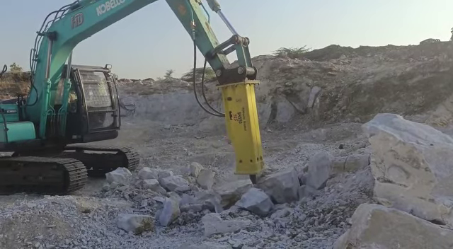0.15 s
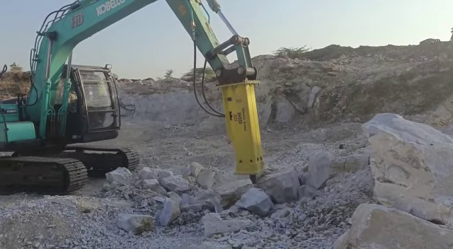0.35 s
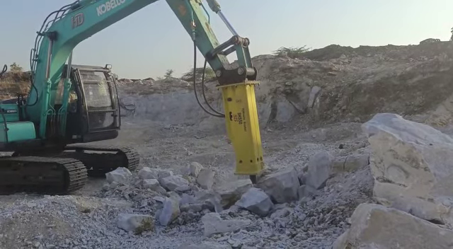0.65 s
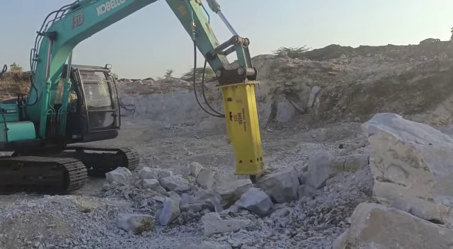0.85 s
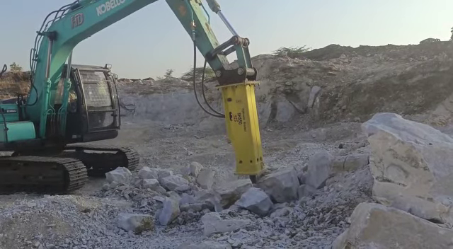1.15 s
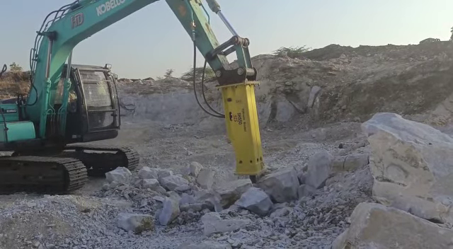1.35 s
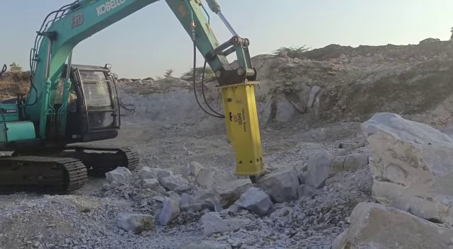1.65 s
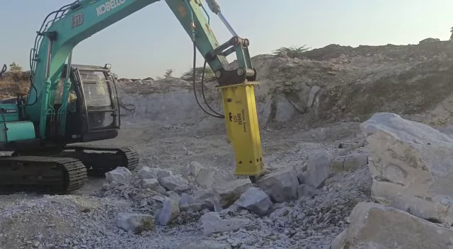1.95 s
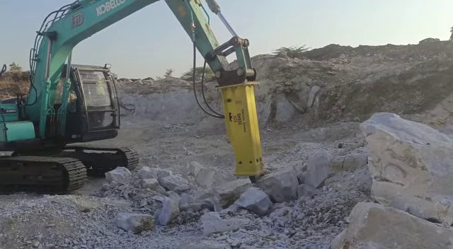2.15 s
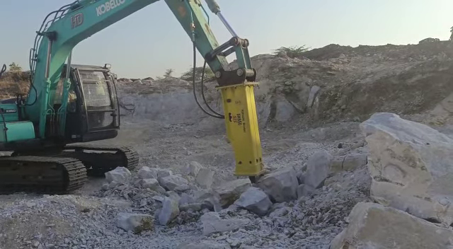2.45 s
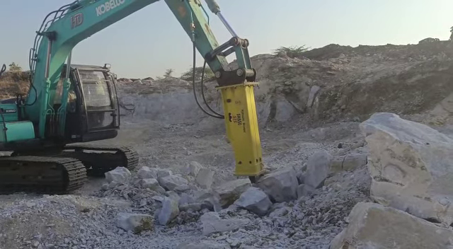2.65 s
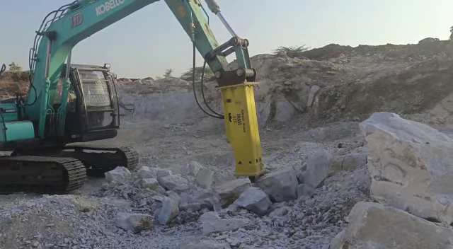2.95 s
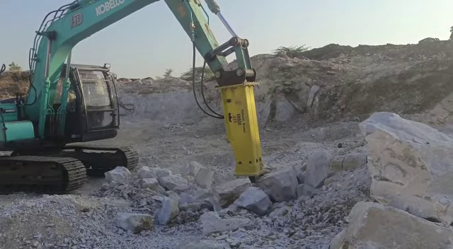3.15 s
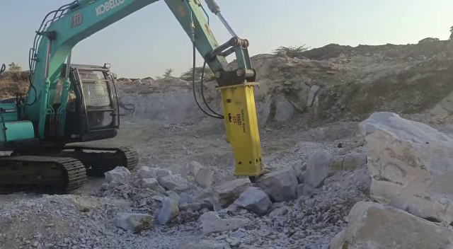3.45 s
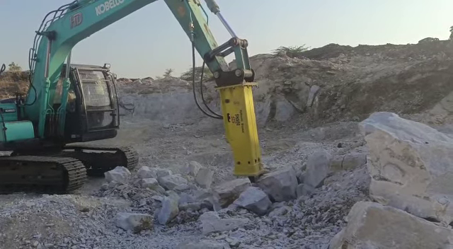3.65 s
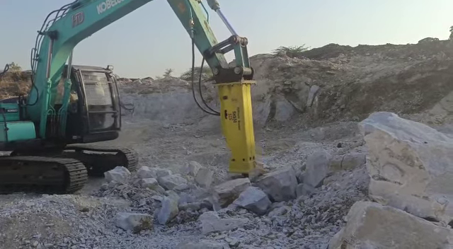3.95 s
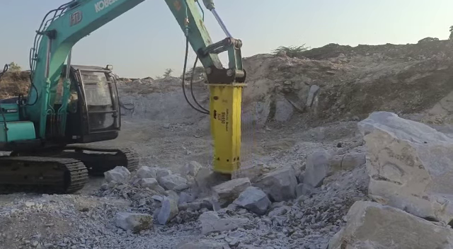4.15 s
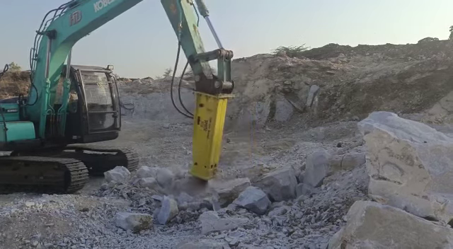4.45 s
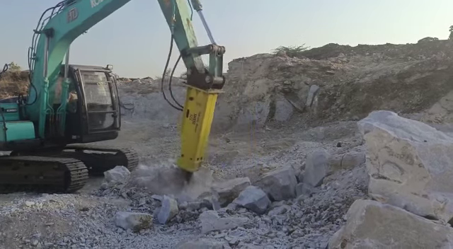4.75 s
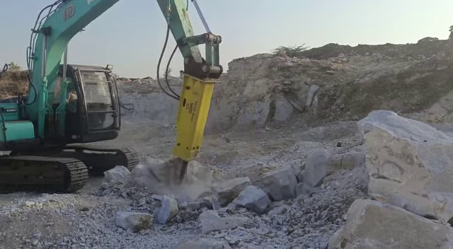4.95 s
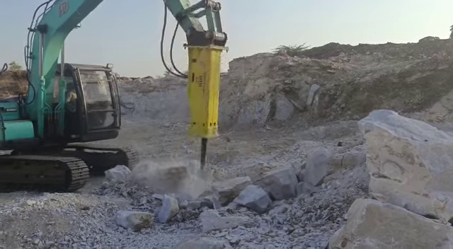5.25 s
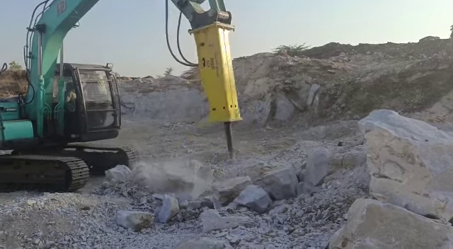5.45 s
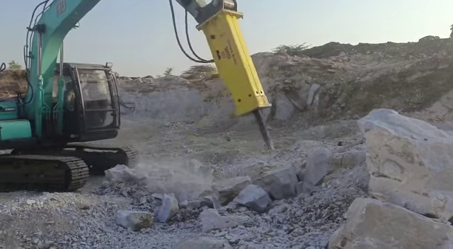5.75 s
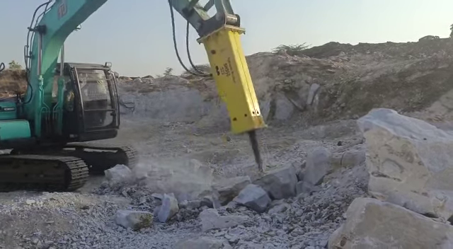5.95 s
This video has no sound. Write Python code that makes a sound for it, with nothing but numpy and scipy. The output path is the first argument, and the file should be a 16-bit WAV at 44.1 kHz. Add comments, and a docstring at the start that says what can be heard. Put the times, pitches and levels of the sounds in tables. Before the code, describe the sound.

A hydraulic breaker hammers stone about nine hard metallic blows a second over a humming diesel, then the stone splits, rubble slides and slack steel clanks.

```python
"""A hydraulic breaker on an excavator hammers stone about nine times a second in an open quarry, then stops.
A valve snaps just ahead of each blow; tool and housing ring, the ground thumps. When the stone splits, rubble
slides and the slack steel clanks; a loose pin pings. The diesel engine and its oil pump hum on throughout.
Hum is shaft-locked sines; crash, valve, engine and slides are shaped noise; steel, pin and grit are struck
resonators; the thump is a falling sine; each knock is a noise puff with a note."""
import sys
import numpy as np
from scipy import signal
from scipy.fft import rfft, irfft, next_fast_len
from scipy.io import wavfile

SR = 44100
rng = np.random.default_rng(int(sys.argv[2]) if len(sys.argv) > 2 else 0)


def transcribe(u):
    """Save the signal u as a 16-bit wav file named by the first command-line argument.

    u: samples, shape (n,) or (channels, n), limited to [-1, 1]; the rate is SR.
    q: integer samples, one column per channel.
    """
    v = np.clip(np.atleast_2d(u).T, -1, 1)
    q = np.round(v * 32767).astype(np.int16)
    wavfile.write(sys.argv[1], SR, q)


def ratio_of_db(decibels):
    """Turn decibels (scalar or array-like) into linear amplitude factors; 0 dB maps to 1."""
    return 10 ** (np.asarray(decibels, float) / 20)


N = 268569

# blows of the breaker: t/s, relative strength/dB
BLOWS = [(0.0619, 0.5), (0.171, 1), (0.2776, 2), (0.3734, 0.5), (0.4696, -0.5), (0.5641, 1.5), (0.66, 0.5),
         (0.7618, 1.5), (0.8676, 0), (0.9754, 0.5), (1.083, -0.5), (1.191, -0.5), (1.2983, 0.5),
         (1.4061, 0), (1.5113, 0), (1.6158, 1), (1.722, 1), (1.8301, 0), (1.937, -0.5), (2.0424, 1.5),
         (2.1487, 0), (2.2571, 0), (2.3656, 0), (2.4716, 0), (2.579, 0.5), (2.6869, 0), (2.796, -1),
         (2.9057, -0.5), (3.0138, -1), (3.1235, 0.5), (3.233, 1), (3.344, 1), (3.4551, 1), (3.5652, 0),
         (3.6702, 0.5)]
BLOW_S, BLOW_DB = np.transpose(BLOWS)
# knocks of stones and slack steel: t/s, relative peak/dB, f/Hz, low tool ring/dB, high tool ring/dB
KNOCKS = [(3.7544, -8, 3330, -31, -26), (3.7599, -2, 1874, -15.5, -40), (3.8751, -23, 920, -37, -46),
          (4.1669, -20, 900, -43, -56), (4.2752, -33, 970, -45, -58), (4.3271, -23, 1640, -35, -55),
          (4.378, -17, 1760, -30, -55), (4.398, -18.5, 2980, -41, -50), (4.4104, -12, 868, -36, -57),
          (4.469, -16.5, 1380, -37, -62), (4.7022, -24, 2180, -38, -63), (4.7935, -23, 1860, -31, -63),
          (4.8257, -21, 1380, -30, -62), (4.8539, -20, 1420, -28, -61), (4.9207, -16, 870, -10.5, -58),
          (4.974, -10, 4170, -27, -50), (4.9782, -6, 1310, -11.5, -32), (5.010, -8, 4170, -17, -50),
          (5.0145, 0, 1367, -33, -14), (5.0344, -5, 1223, -21, -47), (5.0614, -12, 2160, -15, -52),
          (5.068, -18, 3550, -17.5, -62), (5.1044, -13.5, 1920, -31, -62), (5.14, -23, 2282, -27, -65),
          (5.198, -24, 2200, -45, -63), (5.301, -27, 2220, -34, -62), (5.361, -22, 2450, -34, -68),
          (5.6895, -18, 850, -31, -62), (5.7268, -18, 850, -32, -65), (5.7742, -13, 1250, -18, -43),
          (5.8043, -2.5, 1850, -15, -15), (5.8644, -16, 910, -29, -50), (5.9788, -31, 1830, -25, -54),
          (6.0242, -5.5, 1375, -19, -44), (6.0592, -8, 1210, -13, -17.5)]
# machine levels over time: t/s, relative engine noise/dB, pump tone/dB
MACHINE = [(0.0, -15, -30), (0.71, -19.5, -31), (1.34, -20.5, -26), (3.27, -19, -25.5), (3.63, -17.5, -26),
           (3.95, -23, -33), (4.17, -20.5, -35), (4.44, -19, -29), (4.83, -21, -35.5), (5.02, -16.5, -31),
           (5.34, -25.5, -30), (5.89, -22.5, -30), (6.09, -29, -38)]
# left-right likeness: f/Hz, likeness (0..1)
LIKENESS = [(60, 0.98), (150, 1), (380, 0.83), (950, 0.68), (2380, 0.56), (5980, 0.069), (15000, 0.024)]

VALVE_LEAD_S = 0.01976   # valve ahead of the blow
SPLIT_S = 3.69   # stone splits
PUMP_HZ = 274.5   # ninth multiple of the shaft rate


def at_hz(points, hz):
    """Read a table on a log-frequency axis."""
    f, value = np.array(points)[:, 0], np.array(points)[:, 1]
    return np.interp(np.log(hz), np.log(f), value)


def in_time(rows):
    """Columns of a curve, one value a sample."""
    s, *columns = np.transpose(rows)
    return [np.interp(np.arange(N) / SR, s, c) for c in columns]


def drift(rate_hz):
    """Slow chance of spread 1: noise through two equal poles, worked out every 40 samples."""
    r = np.exp(-80 * np.pi * rate_hz / SR)
    slow = signal.lfilter([1], [1, -2 * r, r * r], rng.standard_normal(N // 40 + 2002))[2000:]
    return np.interp(np.arange(N) / 40, np.arange(len(slow)), slow / slow.std())


def train(s, heights):
    """Impulses at the given times, on a tiny floor."""
    out = np.full(N, 1e-18)
    at = np.clip(np.round(np.asarray(s) * SR).astype(int), 0, N - 1)
    np.add.at(out, at, heights)
    return out


def swell(x, rise_s, t60_s):
    """Each impulse rises and then dies away, height about 1."""
    up, down = np.exp(-1 / (rise_s * SR)), ratio_of_db(-60 / (t60_s * SR))
    return signal.lfilter([1 - up], np.convolve([1, -up], [1, -down]), x)


def ring(x, hz, t60_s, bend=1):
    """A unit click rings a sine of height 1; each port has its own phase, further apart in the treble."""
    pole = ratio_of_db(-60 / (t60_s * SR)) * np.exp(2j * np.pi * hz / SR)
    turn = np.arccos(np.clip(at_hz(LIKENESS, hz), 0, 1)) / 2 * rng.choice([-1, 1])
    port_phase = np.exp(1j * turn * np.array([[1], [-1]]))
    return (signal.lfilter([1], [1, -pole], x) * bend * port_phase).imag


def swelling(force, hz, t60_s, build_s, bend=1):
    """A ring that starts from nothing: a fast-dying twin cancels its start."""
    r, w = np.exp(-1 / (max(build_s, 1e-4) * SR)), 2 * np.pi * hz / SR
    twin = signal.lfilter([1 - r], [1, -r * np.exp(1j * w)], force)
    return ring(twin, hz, t60_s, bend)


def pair(hz, mid, side):
    """Left and right from two signals, as alike as this pitch arrives at the ports."""
    alike = np.clip(at_hz(LIKENESS, hz), 0, 1)
    return np.sqrt((1 + alike) / 2) * mid + np.sqrt((1 - alike) / 2) * side * [[1], [-1]]


def seating():
    """As the tool sinks in, the thump grows, the steel is damped and its contact modes shift."""
    # t/s, contact pitch shift/%, relative ground thump/dB, housing/dB, shank/dB, collar/dB, tip/dB, hiss/dB
    sinking = [(0.06, -1, -35, 4, 2, 6.5, 1, 0), (0.2, 0, -25.5, 5.5, 2.5, 4, 0.5, 1),
               (0.47, 1.5, -23.5, 1, 6.5, 2.5, -1.5, 2), (0.8, 0.5, -26, 3.5, 1.5, 3, -1.5, -0.5),
               (1.2, 3.5, -23.5, -1.5, 4, 4, 1.5, 2), (1.65, 3, -22.5, -2, 4, 3.5, 0, 1),
               (2.05, 2.5, -21.5, 0.5, 4.5, 0, 0, 2), (2.3, 0.5, -23.5, -3.5, 1.5, -0.5, 0, 2.5),
               (2.85, 0, -20.5, -3.5, 0, 1.5, 1.5, 4.5), (3.2, 0, -21, 3.5, -0.5, 2, -1.5, 2.5),
               (3.45, 1, -20.5, -5.5, 0.5, 1.5, -1.5, 3), (3.67, -1, -21.5, 2, -4, 3, -2, 2)]
    at, shift, *parts = np.transpose(sinking)
    return np.interp(BLOW_S, at, shift) / 100, *[np.interp(BLOW_S, at, p) + BLOW_DB for p in parts]


def strength(parts, hz):
    """Height of every blow at this pitch, interpolated between the parts that sound there."""
    # pitches of housing, shank, collar, tip and hiss: f/Hz
    part_hz = [700, 1450, 2200, 3800, 9000]
    return ratio_of_db([np.interp(np.log(hz), np.log(part_hz), p) for p in parts.T])


def slides_db(rows, rise_s, trickle_db):
    """Each slide swells, lasts and dies away above the trickle after the split; level in dB, on a 1 ms grid."""
    t = np.arange(0, N / SR, .001)
    power = ratio_of_db(2 * trickle_db) * (t > SPLIT_S) + 1e-10
    for s, length_s, db, t60_s in rows:
        after = np.maximum(t - s, 0)
        fade_db = -60 * np.maximum(after - length_s, 0) / max(t60_s, .01)
        rise = 1 - np.exp(-(after / rise_s) ** 2)
        power += (ratio_of_db(db + fade_db) * rise) ** 2
    return np.interp(np.arange(N) / SR, t, 10 * np.log10(power))


def machine():
    """Pump tone and shaft orders: sines locked to one shaft, all wavering in level and phase."""
    # shaft orders: multiple of shaft rate, level re pump tone/dB
    orders = [(2, -15), (4, -15), (6, -17), (8, -41), (10, -15), (21, -18), (27, -18)]
    turn = 2 * np.pi * PUMP_HZ / 9 * np.arange(N) / SR + 0.386 * drift(1.256)
    out = ratio_of_db(2.0 * drift(2.6)) * np.sin(9 * turn + 0.29 * drift(25.0))
    for k, db in orders:
        out += ratio_of_db(db + 3.7 * drift(5.5)) * np.sin(round(k) * turn + 0.48 * drift(14))
    return out * np.sqrt(2) * ratio_of_db(in_time(MACHINE)[1])


def engine_power(hz, engine):
    """Engine noise in one band, pulsing at twice the shaft rate."""
    # engine spectrum: f/Hz, relative density/dB
    engine_tone = [(25, -26), (48, -14), (65, -8), (100, -11), (165, -2), (250, -7), (320, -8), (430, -20),
                   (659, -12), (1160, -24), (2760, -26), (3720, -30), (6210, -41), (16000, -46)]
    firing = 1 + 0.21 * np.sin(2 * np.pi * PUMP_HZ * 2 / 9 * np.arange(N) / SR)
    return (ratio_of_db(15.5 + at_hz(engine_tone, hz) + 1.94 * drift(9.2)) * engine * firing) ** 2


def valve_power(hz, end):
    """Valve snap in one band: a noise burst ahead of each blow."""
    # valve spectrum: f/Hz, relative density/dB
    valve_tone = [(530, -40), (900, -8), (2220, -3), (2630, -88), (2960, -1), (4360, -4), (6110, -12.5),
                  (7140, -6.5), (11000, -14), (14000, -4.5), (16000, -17)]
    chance = ratio_of_db(rng.normal(0, 1.5, len(BLOW_S)))
    snap = swell(train(BLOW_S - VALVE_LEAD_S, chance)[:end], 0.0029, 0.083)
    return (ratio_of_db(-10.5 + at_hz(valve_tone, hz)) * snap) ** 2


def crash_power(hz, parts, end):
    """Crushed stone in one band: a sharp hit, plus a bite of 3.9 ms with a pitch-dependent decay."""
    # crash spectrum: f/Hz, relative density/dB
    crash_tone = [(280, -71), (480, 3.5), (1120, -7), (1490, -1.5), (1800, -5.5), (2270, -9), (2670, -13.5),
                  (4400, -3), (5990, -24), (7460, -11.5), (11400, -17), (14200, -15.5), (16000, -44)]
    # decay of the bite: f/Hz, t60/s
    crash_t60 = [(300, 0.022), (1000, 0.33), (3000, 0.22), (8000, 0.18), (11000, 0.088), (13500, 0.31),
                 (16000, 0.2)]
    hit = train(BLOW_S, strength(parts, hz))[:end]
    bite, total = round(0.0039 * SR), np.cumsum(hit)
    held = (total - np.pad(total, (bite, 0))[:end]) / bite + 1e-18
    crash = swell(hit, 0.00028, 0.13) + 1.29 * swell(held, 0.00027, at_hz(crash_t60, hz))
    return (ratio_of_db(-12.0 + at_hz(crash_tone, hz)) * crash) ** 2


def grind_power(hz, rubble, scrape, grit):
    """Sliding rubble in one band; above 10 kHz, grit scraping along the tool."""
    # grinding spectrum: f/Hz, relative density/dB
    grind_tone = [(40, -44), (80, -1), (130, -33), (200, -5.5), (278, 3), (529, -18.5), (791, 5.5),
                  (1020, -16.5), (1350, -3), (1620, -12), (1910, -7.5), (4200, -20.5), (5630, -26),
                  (9000, -27.5), (12800, -22), (16000, -66)]
    grind = scrape * ratio_of_db(24.5) if hz > 10000 else rubble * ratio_of_db(13.0)
    return (ratio_of_db(at_hz(grind_tone, hz)) * grind * grit) ** 2


def noise_layers(parts, rubble_db, scrape_db):
    """One third-octave noise bank plays engine, valve, crash and rubble, their powers summed."""
    engine, rubble, scrape = ratio_of_db(in_time(MACHINE)[0]), ratio_of_db(rubble_db), ratio_of_db(scrape_db)
    grit = ratio_of_db(2.18 * drift(28) + 1.1 * drift(270))   # stones slip in uneven jerks
    end = round((BLOW_S[-1] + .4) * SR)   # last blow has died away
    out, edges_hz = 0, 25 * 2 ** (np.arange(29) / 3)
    white = rng.standard_normal((2, 2, N))   # neighbouring bands get unrelated noise
    for k, (low, high) in enumerate(zip(edges_hz, edges_hz[1:])):
        band = signal.butter(2, [low, high], "band", fs=SR, output="sos")
        mid, side = signal.sosfilt(band, white[k % 2])
        hz = np.sqrt(low * high)
        power = engine_power(hz, engine)
        if hz > 200:
            power[:end] += valve_power(hz, end) + crash_power(hz, parts, end)
        power = power + grind_power(hz, rubble, scrape, grit)
        out = out + np.sqrt(power) * pair(hz, mid, side)
    return out


def steel(parts, shift):
    """Tool and housing modes, struck by nearly the same contacts each blow and lightly by the valve."""
    # modes while pressed on the stone: f/Hz, relative level/dB, t60/s, build-up/s
    steel_modes = [(627, -18.5, 0.081, 0.00093), (712, -8.5, 0.21, 0.00063), (905.7, -13, 0.18, 0.00044),
                   (1076, -16, 0.1, 0.009), (1335, -7, 0.13, 0.0057), (1430, 1.5, 0.033, 0.0072),
                   (1493, -5, 0.051, 0.015), (1559, -9, 0.061, 0.0057), (1613, -23, 0.032, 0.0023),
                   (2110, -12.5, 0.13, 0.0017), (2060, -29.5, 0.048, 0.00033), (2165, -7.5, 0.025, 0.00063),
                   (2331, -11.5, 0.095, 0.0062), (3010, -14.5, .11, 0.011), (3100, 2, 0.0099, 0.0011),
                   (3900, -8.5, 0.097, 0.0013), (4148, -1.5, 0.017, 0.00067), (4410, -8, 0.059, 0.011),
                   (4431, -1.5, 0.037, 0.0048), (5460, -10.5, 0.038, 0.00039), (7350, -15.5, 0.12, 0.0023),
                   (8720, -11, 0.033, 0.00067), (8730, -22.5, 0.067, 0.0015)]
    # strike and rebounds: t after blow/s, relative level/dB
    contacts = [(0, 0.5), (.0034, -0.5), (.0079, -3), (.0128, -5)]
    count = len(BLOW_S)
    after, contact_db = np.transpose(contacts)
    times = BLOW_S[:, None] + after * (1 + .03 * rng.standard_normal((count, len(after))))
    t = np.arange(round((BLOW_S[-1] + .3) * SR)) / SR   # until the last blow has rung out
    last = np.maximum(np.searchsorted(BLOW_S, t) - 1, 0)   # the blow ringing now
    out, since = 0, t - BLOW_S[last]
    for hz, db, t60_s, build_s in steel_modes:
        # seating shifts the contact modes; chance detunes every mode, blow by blow
        detune = shift * (1400 < hz < 2250) + .007 * rng.standard_normal(count)
        bend = np.exp(2j * np.pi * hz * detune[last] * since)
        chance_db = rng.normal(0, 0.5, times.shape) + rng.normal(0, 1.5, (count, 1))
        heights = strength(parts, hz)[:, None] * ratio_of_db(contact_db + chance_db)
        force = train(times.ravel(), heights.ravel()) + train(BLOW_S - VALVE_LEAD_S, ratio_of_db(-12.0))
        out = out + ratio_of_db(db - 14.5) * swelling(force[:len(t)], hz, t60_s, build_s, bend)
    return np.pad(out, ((0, 0), (0, N - len(t))))


def ground(thump_db):
    """The thump is a short wave whose high part arrives first, so its pitch falls."""
    t = np.arange(round(.06 * SR)) / SR
    pitch_hz = 80 + 280 * np.exp(-t / 0.0042)
    size = (1 - np.exp(-t / 0.00093)) * (np.exp(-(t / 0.0099) ** 4) + 0.49 * np.exp(-t / 0.014))
    wave = size * np.sin(2 * np.pi * np.cumsum(pitch_hz) / SR)
    return signal.fftconvolve(train(BLOW_S + 0.0015, ratio_of_db(thump_db + 11.5)), wave)[:N]


def pin():
    """A loose steel pin rings with two thin modes: single pings, and a light shake after every blow."""
    # single pings: t/s, high mode/dB, low mode/dB
    pings = [(.195, -30, -50), (.69, -42, -55), (1.005, -32.5, -55), (1.11, -42, -55), (1.225, -39, -55),
             (1.75, -39, -55), (1.96, -38, -55), (2.38, -33, -50), (3.255, -36, -50), (3.49, -31, -50),
             (3.77, -30.5, -32), (3.95, -40, -35.5), (4.48, -43, -35), (4.585, -34.5, -29),
             (5.05, -45, -45), (5.43, -62, -34), (5.88, -55, -48), (6.05, -44, -50)]
    # high and low mode: f/Hz
    pin_hz = [9997, 3709]
    # high and low mode: t60/s
    pin_t60_s = [.25, 0.28]
    lag_s, level_db, scatter_db = .025, -40, 1.5   # shake
    s, *ping_db = np.transpose(pings)
    shaken = BLOW_S + lag_s
    shake_db = level_db + scatter_db * rng.standard_normal((len(shaken), 2))
    out = 0
    for hz, t60_s, db, light_db in zip(pin_hz, pin_t60_s, ping_db, shake_db.T):
        out = out + swelling(train(s, ratio_of_db(db)) + train(shaken, ratio_of_db(light_db)), hz, t60_s, .003)
    return out


def gravel(rubble_db):
    """Small stones tick at random and ring a few cycles, louder the harder the rubble grinds."""
    sizes = ratio_of_db(1.5 * np.minimum(rng.exponential(1, N), 4)) * rng.choice([-1, 1], N)
    born = rng.random(N) < 180 * ratio_of_db(4 * drift(12)) / SR   # about 180 a second, unevenly
    pitches_hz, dealt = np.geomspace(500, 5000, 14), rng.integers(0, 14, N)
    force = sizes * born * ratio_of_db(rubble_db - 22) + 1e-18
    split, ticks = round(SPLIT_S * SR), 0
    for k, hz in enumerate(pitches_hz):
        struck = (force * (dealt == k))[split:] + 1e-18
        ticks = ticks + ratio_of_db(-3 * np.log2(hz / 1000)) * ring(struck, hz, 4.7 / hz)
    return np.pad(ticks, ((0, 0), (split, 0)))


def slack_tool(scrape_db):
    """Knocks ring the free tool: low modes most near the knock's pitch, high modes together."""
    # free tool modes: f/Hz, relative level/dB, t60/s
    slack_modes = [(732, -2, .2), (800, 0, .2), (1310, -3, .15), (1437, -6, .12), (1890, -5, .15),
                   (2160, -1, .16), (2342, -5, .12), (2920, -12, .17), (3548, -8, .24), (4170, -8, .12),
                   (5986, -17, .12), (6720, -13, .14), (7924, -12, .1), (8075, -14, .2), (8748, -12, .2),
                   (12300, -6, .04), (12700, -6, .06), (13170, -2, .14), (14390, -14, .1), (15300, -5, .11)]
    s, _, knock_hz, low_db, high_db = np.transpose(KNOCKS)
    # scraping grit keeps the highest modes singing
    rubbing = ratio_of_db(scrape_db - 43) * rng.standard_normal(N)
    out, split = np.zeros((2, N)), round(SPLIT_S * SR)
    for hz, db, t60_s in slack_modes:
        low = ratio_of_db(low_db - 10.0 * abs(np.log2(hz / knock_hz)))
        heights = low if hz < 5000 else ratio_of_db(high_db)
        chance_db = rng.normal(0, 2, len(s))
        force = train(s, heights * ratio_of_db(chance_db)) + rubbing * (hz > 12000)
        out[:, split:] += ratio_of_db(db) * swelling(force[split:], hz, t60_s, 0.00023)
    return out


def knocks():
    """Each knock is a broad crack, a short puff of noise and a note that rings a little longer."""
    t60_s, shorter = 0.038, 0.28   # puff decay at 0 dB; dB of ring time lost per dB weaker
    crack_s, crack_db = 0.0012, -5.5
    out, t = np.zeros((2, N)), np.arange(round(.15 * SR)) / SR
    for s, db, hz, _, _ in KNOCKS:
        fade_db = -60 * t / (t60_s * ratio_of_db(shorter * db))
        mid, side = rng.standard_normal((2, len(t))) * (1 - np.exp(-t / 0.0003)) * ratio_of_db(fade_db)
        band = signal.butter(2, [hz / 1.8, hz * 2.4], "band", fs=SR, output="sos")
        puff = signal.sosfilt(band, pair(hz, mid, side))
        note = np.sin(2 * np.pi * hz * t) * (1 - np.exp(-t / 0.00029)) * ratio_of_db(fade_db / 2.7)
        burst = np.exp(-t / crack_s) * rng.standard_normal(len(t))
        crack = ratio_of_db(crack_db) * signal.lfilter([.4], [1, -.8], burst)
        at = round(s * SR)
        out[:, at:at + len(t)] += (ratio_of_db(db - 1.6) * (puff + 0.5 * (note + crack)))[:, :N - at]
    return out


def scene():
    """All sources; ringing, thump and knocks come back as a few echoes, from alternate sides."""
    # rubble slides: start/s, length/s, relative level/dB, t60/s
    slides = [(3.68, 0.1, -14, 0.21), (3.87, 0.074, -22, 0.17), (4.18, 0.11, -26, 0.63),
              (4.27, .015, -15.5, 0.22), (4.3, 0.15, -26, 0.76), (4.78, 0.14, -31, 0.48),
              (4.91, 0.0091, -14.5, 0.32), (4.965, 0.062, -10.5, 0.32), (5.37, 0.033, -31.5, .5),
              (5.68, .015, -32, .06), (5.722, .008, -21.5, 0.024), (5.775, 0.035, -11, 0.49),
              (5.975, .01, -23.5, 0.82), (6.02, 0.083, -12.5, .3)]
    # grit scraping along the tool, heard high up: start/s, length/s, relative level/dB, t60/s
    scrapes = [(3.69, 0.14, -34, .08), (3.89, 0.029, -19.5, 0.07), (4.165, 0.0072, -24.5, .1),
               (4.2, 0.1, -21.5, 0.085), (4.39, .01, -39, 0.34), (4.965, 0.015, -25, 0.12),
               (5.012, 0.021, -16.5, 0.067), (5.205, 0.0068, -38, 0.046), (5.79, .025, -24, .25),
               (6.02, .03, -31, .1), (6.06, .03, -29, .1)]
    # echoes off blocks and the quarry face: delay/s, level before the side tilt/dB
    echoes = [(.013, -23.5), (.031, -22), (.047, -78)]
    shift, thump_db, *parts = seating()
    # 1 dB scatter from blow to blow, each part on its own
    parts = np.array(parts) + 1.0 * rng.standard_normal((len(BLOWS), len(parts))).T
    rubble_db = slides_db(slides, 0.0048, -41)   # fine grit trickles on after the split
    scrape_db = slides_db(scrapes, 0.0047, -61)
    struck = steel(parts, shift) + ground(thump_db) + pin()
    struck = struck + gravel(rubble_db) + slack_tool(scrape_db) + knocks()
    out = machine() + noise_layers(parts, rubble_db, scrape_db) + struck
    for k, (s, db) in enumerate(echoes):
        lag = round(s * SR)
        tilt_db = [[3], [-3]] if k % 2 else [[-3], [3]]
        out[:, lag:] += ratio_of_db(db) * struck[:, :-lag] * ratio_of_db(tilt_db)
    return out


def low_pass(x):
    """Removes everything above the highest recorded frequency."""
    return signal.sosfilt(signal.butter(12, 16660, fs=SR, output="sos"), x)


def record(dry):
    """Two ports differ in colour and cut deep bass; loud moments turn the gain down, peaks are rounded."""
    # left microphone port over right: f/Hz, level/dB
    left_db = [(60, 2), (99, -1.5), (160, 1), (270, -1.5), (450, 1), (740, 1.5), (1220, 4.5), (2010, -1),
               (3330, 2.5), (5500, 3.5), (9080, -3), (15000, 17.5)]
    threshold_db, db_lost_per_db, memory_s = -21, 0.18, 0.049   # gain control
    size = next_fast_len(N)
    half = ratio_of_db(at_hz(left_db, np.arange(1, size // 2 + 2) * SR / size) / 2)
    x = irfft(rfft(dry, size) * [half, 1 / half], size)[:, :N]
    x = signal.sosfilt(signal.butter(3, 48, "high", fs=SR, output="sos"), x)
    r = np.exp(-1 / (memory_s * SR))
    power = signal.lfilter([1 - r], [1, -r], np.mean(x ** 2, axis=0))
    level_db = 10 * np.log10(power + 1e-9)
    x = x * ratio_of_db(1.5 - db_lost_per_db * np.maximum(level_db - threshold_db, 0))
    return low_pass(1.105 * np.tanh(x / 1.229))


dry = scene()
out = record(dry)
transcribe(out)
```